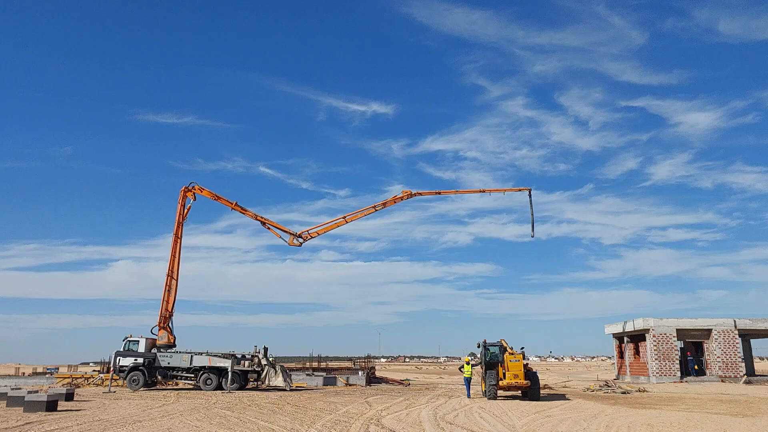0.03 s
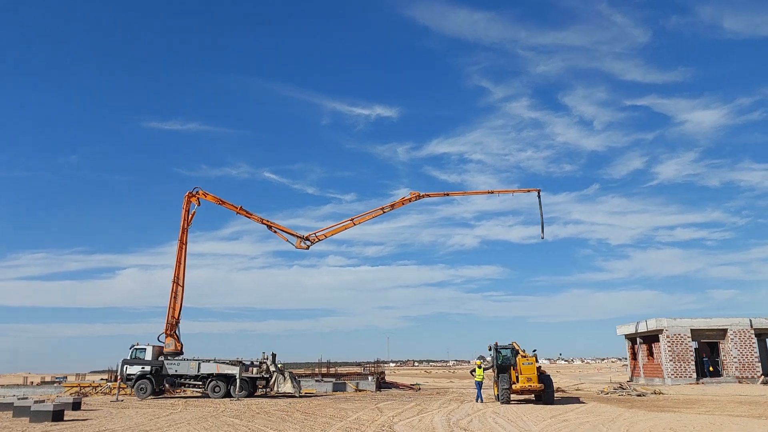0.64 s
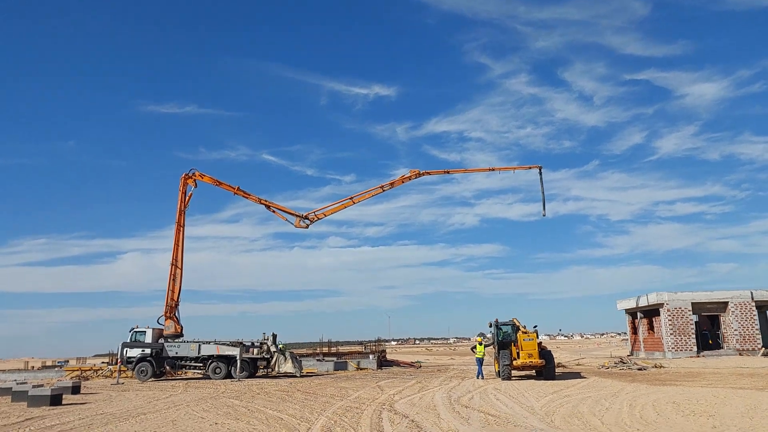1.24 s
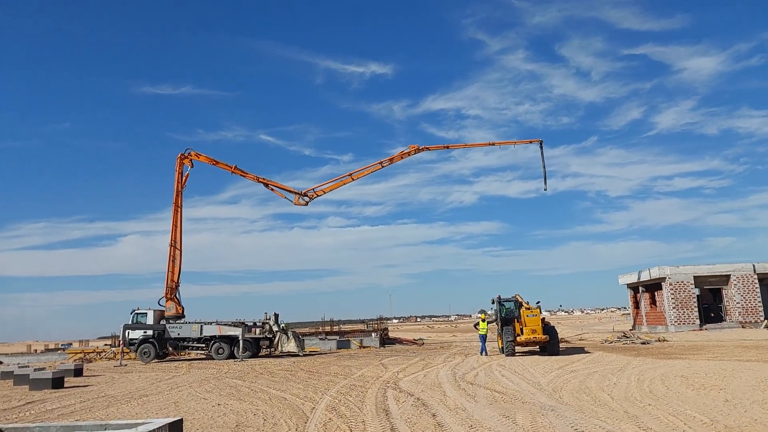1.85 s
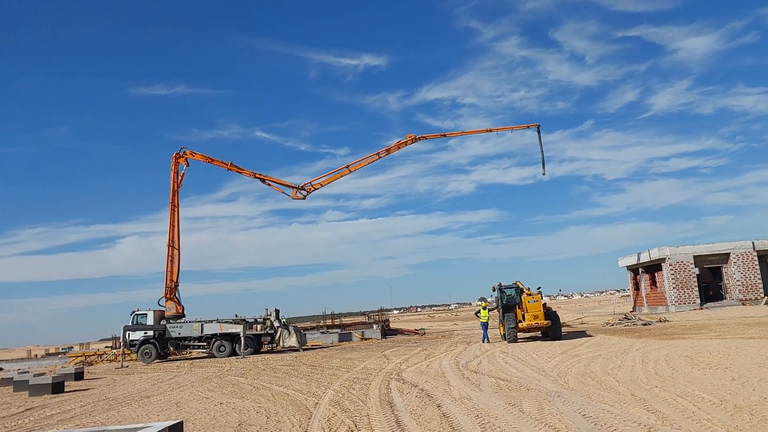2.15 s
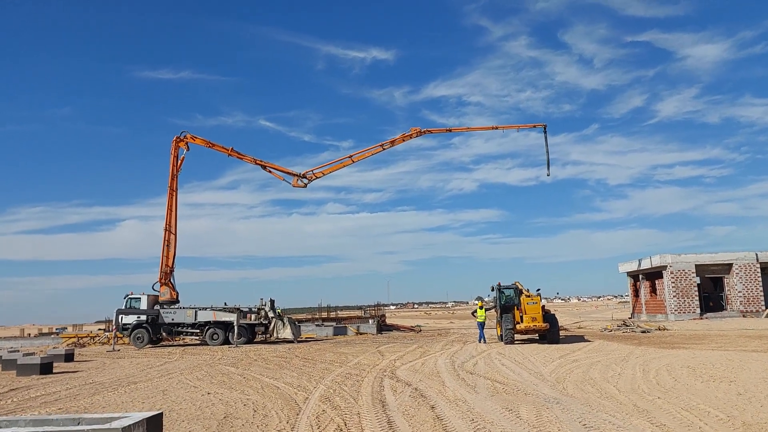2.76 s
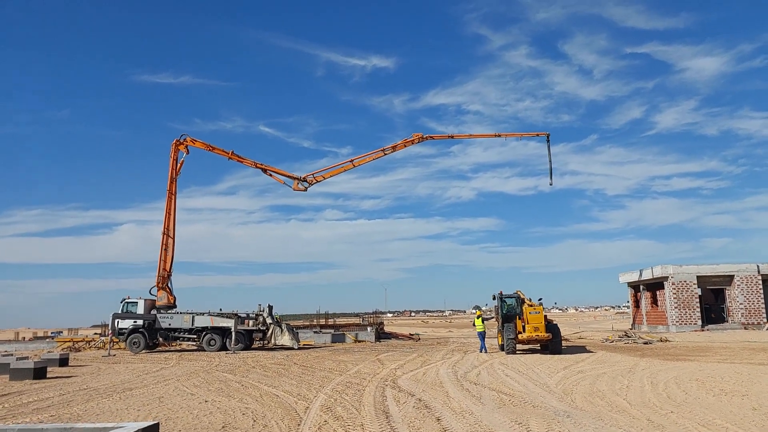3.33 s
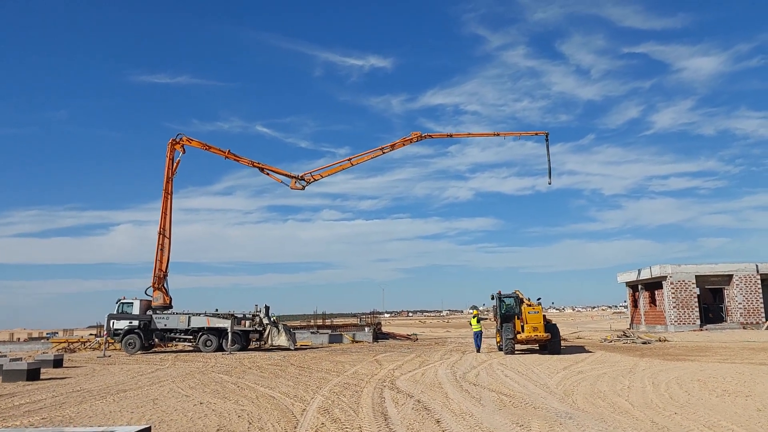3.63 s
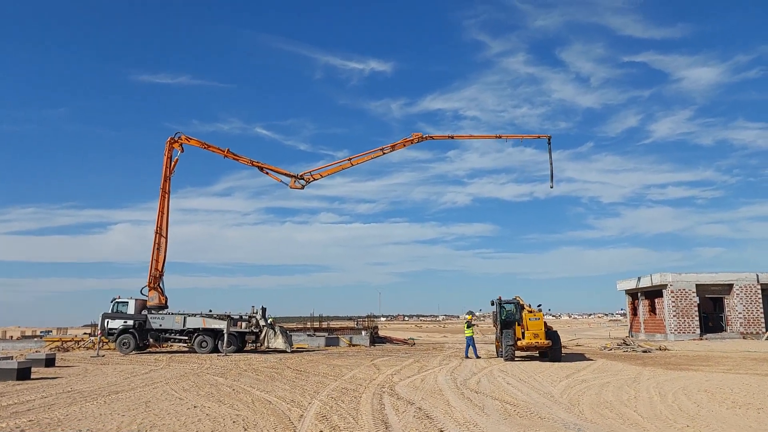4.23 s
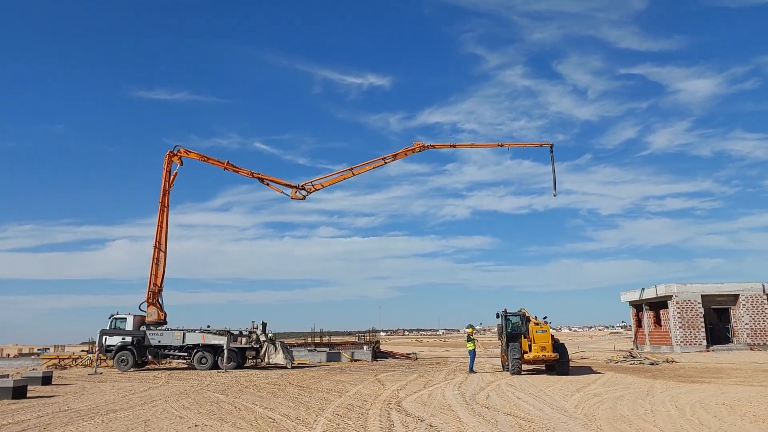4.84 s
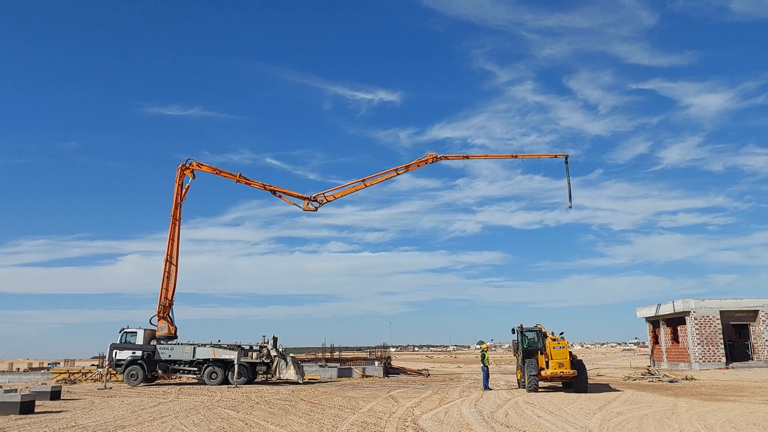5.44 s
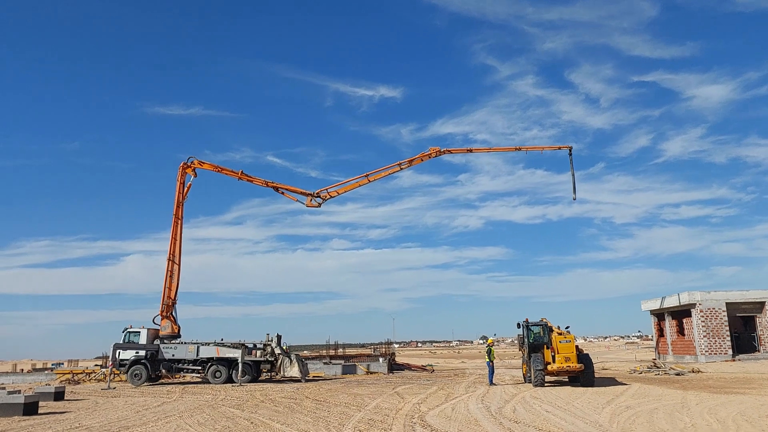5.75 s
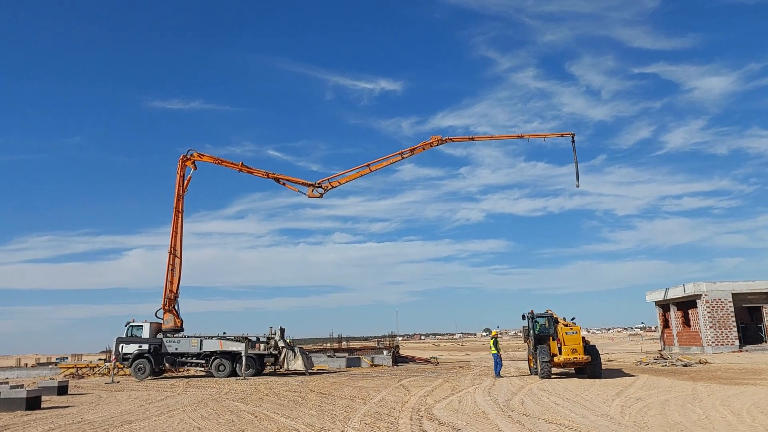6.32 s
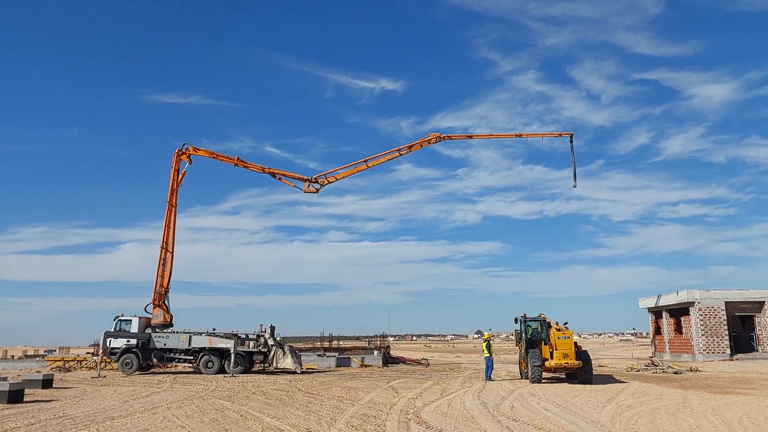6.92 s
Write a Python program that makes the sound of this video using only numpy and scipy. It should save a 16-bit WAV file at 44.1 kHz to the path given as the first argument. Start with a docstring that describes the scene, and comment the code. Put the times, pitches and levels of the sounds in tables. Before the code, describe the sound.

Wind rumbles and flutters on a hand-held microphone at an open building site, with many irregular low thumps. Farther off and quieter, a concrete pump truck's diesel runs steadily beside an idling loader, with a low drone, a wavering gear whine and faint hydraulic hiss. The machines grow a little clearer after about three seconds. Two harder gusts hit the microphone, one just past the middle and one near the end.

```python
"""Concrete pump on a windy building site

Across open ground a pump truck's diesel knocks at working speed, its gear teeth and pistons whining,
while a wheel loader idles beside it. Cooling fans rush and oil hisses through the boom's valves.
Close up, gusts and single eddies buffet the two ports of a hand-held microphone."""
import sys
import numpy as np
from scipy.fft import rfft, irfft, next_fast_len
from scipy.io import wavfile
from scipy.ndimage import uniform_filter1d, minimum_filter1d, map_coordinates

SR = 44100
rng = np.random.default_rng(int(sys.argv[2]) if len(sys.argv) > 2 else 0)


def waveform_to_disk(signal):
    """Save audio, clipped to [-1, 1], as 16-bit WAV at the path in sys.argv[1]."""
    frames = np.transpose(np.atleast_2d(signal))
    scaled = np.clip(frames, -1, 1) * 32767
    samples = np.round(scaled).astype(np.int16)
    wavfile.write(sys.argv[1], SR, samples)


N = 312228
T = np.arange(N) / SR
SIDES = np.array([[1], [-1]])  # left port, right port


def amp(db):
    """Decibels to gain."""
    return 10 ** (np.asarray(db) / 20)


def unit(x):
    """x at rms 1."""
    return x / np.sqrt(np.mean(x ** 2) + 1e-20)


def along(points, hz):
    """(Hz, value) points read on a log axis."""
    f, v = np.transpose(points)
    return np.interp(np.log(hz + 1), np.log(f + 1), v)


def curves(rows):
    """One value per sample for each column after the time."""
    s, *cols = np.transpose(rows)
    return [np.interp(T, s, c) for c in cols]


def wobble(rate):
    """A smooth random curve, rate knots a second."""
    return map_coordinates(rng.standard_normal(int(N * rate / SR) + 4), [T * rate], mode="mirror")


def filtered(x, response):
    """x times a response of frequency."""
    m = next_fast_len(N + 8192)
    return irfft(rfft(x, m) * response(np.fft.rfftfreq(m, 1 / SR)), m)[..., :N]


def coloured(x, spectrum):
    """x shaped by a spectrum, at rms 1."""
    return unit(filtered(x, lambda hz: amp(along(spectrum, hz))))


def swelled(steady_db, swells, fall=0.44):
    """A level in dB with swells (peak_s, length_s, level_db) that build slowly and stop sooner."""
    bell = lambda age, length: np.exp(-(age / length / np.where(age > 0, fall, 1 - fall)) ** 2)
    power = amp(steady_db) ** 2 + sum(amp(db) ** 2 * bell(T - s, length) for s, length, db in swells)
    return 10 * np.log10(power)


def turns(hz, drift):
    """Angle in turns at a slightly drifting speed."""
    return np.cumsum(hz * (1 + drift * wobble(3))) / SR


def tone(angle, order, fade_db=0.8):
    """A distant partial: nearly steady in phase on the straight path, wandering on two scattered ones."""
    paths = []
    for drift in [0.26 * wobble(7.3), 2.3 * wobble(4), 2.34 * wobble(4)]:
        fading = amp(fade_db * (wobble(2.98) + 0.64 * wobble(14)))
        paths.append(unit(fading * np.sin(2 * np.pi * (order * angle + rng.random()) + drift)))
    return np.array(paths)


# Low drone across the site: pitch_hz, level_db
DRONE_PARTIALS = [(106, -56), (212, -49), (317, -51), (424, -53.5)]
def drone():
    """A few low, slowly wavering partials."""
    clock = turns(1, drift=0.0029)
    return sum(amp(db) * tone(clock, order=hz, fade_db=6.0) for hz, db in DRONE_PARTIALS)


# Air resonances in the far engines: pitch_hz, width_hz, relative_db
AIR_RESONANCES = [(3270, 82, 10.5), (4310, 26, 8), (5100, 51, 7.5), (9100, 110, -5), (9380, 110, -2),
                  (10100, 200, -3)]
def whistles():
    """Air rushing through the engines whistles thinly, following the upper whine's level."""
    whine_db, = curves(UPPER_WHINE)
    level_db = -66.5 + 0.5 * (whine_db - whine_db.mean()) + wobble(4.1)
    peaks = lambda hz: sum(amp(db) / (1 + (2 * (hz - pitch) / width) ** 2)
                           for pitch, width, db in AIR_RESONANCES)
    return amp(level_db) * unit(filtered(rng.standard_normal((3, N)), peaks))


# Oil hiss from the distant boom: frequency_hz, relative_db
OIL_SPECTRUM = [(2000, -42), (3000, -8), (3400, -2), (3750, -7), (4050, -1), (4500, -14), (6000, -42)]
# Its spurts: peak_s, length_s, level_db
OIL_SPURTS = [(1.3, 0.32, -60.5), (2.55, 0.2, -68), (2.88, 0.14, -68), (3.68, 0.18, -60),
              (5.152, 0.42, -56.5)]
def valves(seep_db=-16, sputter_db=2.2):
    """Oil seeps and spurts through the boom's valves with an uneven hiss."""
    clatter_db, _ = curves(SITE_CARRY)
    level_db = swelled(clatter_db + seep_db, OIL_SPURTS) + sputter_db * wobble(16)
    return amp(level_db) * coloured(rng.standard_normal((3, N)), OIL_SPECTRUM)


# The far fans' rush and highest hiss: frequency_hz, relative_db
RUSH_SPECTRUM = [(150, -23), (350, 15.5), (700, 17), (1200, 14.5), (1800, 14.5), (3500, 4), (4200, 3.5),
                 (4800, 0), (5600, 1), (6500, -0.5), (7900, -8), (9800, -5.5), (11400, -13.5), (15800, -23)]
FIZZ_SPECTRUM = [(5000, -40), (8000, -9), (9600, -1.5), (11400, 1), (13000, 3), (14200, -4), (15800, -9.5)]
def fans():
    """Cooling fans push air; their highest hiss swings wider in level than their rush."""
    _, fan_db = curves(SITE_CARRY)
    shimmer_db = 0.55 * wobble(9)
    fizz_db = -68.5 + 1.2 * (fan_db - fan_db.mean())
    rush = amp(fan_db + 14) * coloured(rng.standard_normal((3, N)), RUSH_SPECTRUM)
    fizz = amp(fizz_db) * coloured(rng.standard_normal((3, N)), FIZZ_SPECTRUM)
    return amp(shimmer_db) * (rush + fizz)


def diesel(angle, spectrum, repeat, decay, uneven_db, cylinders=6):
    """Knocks of a four-stroke engine along three paths: straight, and scattered to each port."""
    cycle = angle / 2 % 1
    cycle_samples = int(2 * N / angle[-1])
    # part of the block's rattle repeats every working cycle
    pattern = rng.standard_normal((3, cycle_samples))[:, (cycle * cycle_samples).astype(int)]
    rattle = np.sqrt(repeat) * pattern + np.sqrt(1 - repeat) * rng.standard_normal((3, N))
    # each cylinder fires with its own strength, and its knock fades until the next
    firing = cycle * cylinders
    strength = amp(uneven_db * unit(rng.standard_normal(cylinders)))[firing.astype(int)]
    return coloured(rattle * strength * np.exp(-decay * (firing % 1)), spectrum)


# A steel panel's ring across the site: frequency_hz, relative_db
PANEL_SPECTRUM = [(1500, -60), (2040, -22), (2115, 5), (2180, 1), (2255, -5), (2330, -17), (3200, -58)]
def panel(idle):
    """A steel panel rings near the gear octave, in throbs at the idling engine's firing rate."""
    _, octave_db = curves(GEAR_WHINE)
    return amp(octave_db - 2) * diesel(idle, PANEL_SPECTRUM, repeat=0.26, decay=1.7, uneven_db=2.5)


# The truck's gear whine from a distance: time_s, mesh_db, octave_db
GEAR_WHINE = [(0.1, -68, -66), (0.95, -70, -72), (1.15, -67, -65), (1.55, -74, -58), (2.25, -68, -57),
              (2.5, -64, -53.5), (2.98, -72, -60), (3.12, -62, -47.5), (3.5, -48, -52.5),
              (4.05, -51.5, -55), (4.2, -53.5, -50), (4.6, -53, -56.5), (5.1, -53.5, -53),
              (5.45, -62, -58.5), (6.2, -55, -56), (6.45, -54.5, -44.5), (6.8, -58, -49.5),
              (7.05, -57, -48.5)]
# Upper whine of gears and pump, near 3.3 kHz: time_s, relative_db
UPPER_WHINE = [(0.1, -70), (0.9, -83), (1.6, -65.5), (1.95, -75), (2.6, -64), (2.88, -63), (3.02, -66),
               (3.3, -63), (3.55, -66), (3.88, -54), (4.08, -63), (4.47, -71), (5.0, -60.5), (5.92, -69),
               (6.25, -64), (7.05, -66)]
def gears(crank, teeth=35):
    """The pump drive's teeth bear unevenly; a load swinging twice a turn gives the octave side tones."""
    mesh_db, octave_db = curves(GEAR_WHINE)
    mesh = amp(mesh_db) * tone(crank, teeth) * unit(1 + 0.75 * wobble(70))
    octave = amp(octave_db) * tone(crank, 2 * teeth)
    lower = amp(octave_db - 5) * tone(crank, 2 * teeth - 2)
    upper = amp(octave_db - 8) * tone(crank, 2 * teeth + 2)
    third = amp(curves(UPPER_WHINE)[0] - 2.5) * tone(crank, 3 * teeth, fade_db=3.0)
    fourth = amp(curves(SITE_CARRY)[0] - 20) * tone(crank, 4 * teeth, fade_db=9.0)
    roughness = unit(1 + 0.42 * wobble(45))
    return mesh + roughness * (octave + lower + upper) + third + fourth


# The hydraulic pump's harmonics, 1-10 and 11-13: relative_db
PUMP_LOW = [-9, -8, -21, -21, -7.5, -25, -2, -15, -22, -32]
PUMP_HIGH = [-7, -1.5, -5.5]
# How well the lower ten carry to the microphone: time_s, gain_db
PUMP_REACH = [(0.1, 0), (1.3, -4), (3.0, -1), (4.2, 1), (4.6, 0.5), (5.5, 2), (6.2, -6), (7.0, -8)]
def pump(crank, levels_db, reach, first, pistons=9):
    """Piston strokes make a row of harmonics, here from number `first` up."""
    harmonics = sum(amp(db) * tone(crank, pistons * k) for k, db in enumerate(levels_db, first))
    return amp(curves(reach)[0]) * harmonics


# The two engines from across the site: frequency_hz, relative_db
TRUCK_SPECTRUM = [(90, -31), (220, 11), (420, 10.5), (800, -14), (1100, 0.5), (1500, 1.5), (2020, 1),
                  (2170, 2), (2420, 3.5), (2750, -2), (2950, -10), (3400, -9.5), (4500, -19), (7000, -36),
                  (15000, -56)]
LOADER_SPECTRUM = [(120, -27), (300, 6), (600, -0.5), (1000, 1.5), (1800, -9), (2020, 5), (2180, 1.5),
                   (2600, -11), (3500, -11.5), (4600, -18), (6000, -21.5), (9000, -40), (15000, -54)]
def engines(crank, idle):
    """The truck's diesel clatters at working speed; the loader's knocks at idle."""
    truck = amp(6.5) * diesel(crank, TRUCK_SPECTRUM, repeat=0.81, decay=0.48, uneven_db=4.5)
    loader = amp(4.5) * diesel(idle, LOADER_SPECTRUM, repeat=0.52, decay=0.93, uneven_db=5.5)
    return truck + loader


# Sound that reaches the microphone straight: frequency_hz, power_share
DIRECT_SHARE = [(100, 0.84), (700, 0.97), (1100, 0.77), (1900, 0.53), (2110, 0.82), (2200, 0.9),
                (2320, 0.5), (3400, 0.56), (5200, 0.34), (7500, 0), (13000, 0.1)]
# The left port's lead as sound bends round the housing: frequency_hz, phase_rad
LEFT_LEAD = [(200, .2), (1100, .9), (1400, 1.6), (1650, 2.8), (1900, 2.5), (2170, 4.4), (2400, 3.7),
             (2950, 4.8), (3270, 6), (4650, 9.2), (6120, 12.5), (10900, 20.7), (15400, 29)]
def at_ports(paths):
    """The straight path reaches the right port late; the scattered paths are unrelated."""
    direct = lambda hz: along(DIRECT_SHARE, hz)
    lead = lambda hz: np.exp(1j * SIDES * along(LEFT_LEAD, hz) / 2)
    straight = filtered(paths[0], lambda hz: np.sqrt(direct(hz)) * lead(hz))
    return straight + filtered(paths[1:], lambda hz: np.sqrt(1 - direct(hz)))


# How strongly the machines carry over the site, in relative levels: time_s, clatter_db, fan_db
SITE_CARRY = [(0.3, -67.5, -70), (0.85, -59, -71), (1.55, -60, -65), (2.1, -59.5, -65.5),
              (2.45, -53, -65.5), (3.0, -56, -63), (3.25, -51, -60.5), (3.85, -49.5, -57),
              (4.45, -57.5, -61), (5.05, -53, -61), (5.6, -53.5, -59), (6.2, -52, -60), (7.0, -49.5, -61.5)]
def machines(truck_hz=31.25, loader_hz=12.27):
    """The far machines swell and sink as the wind carries them."""
    # the governors let both crankshafts drift a little
    crank, idle = turns(truck_hz, drift=0.000505), turns(loader_hz, drift=0.00099)
    clatter = engines(crank, idle)
    carry = amp(curves(SITE_CARRY)[0] + 1.5 + 1.4 * wobble(6.8))
    running = carry * (clatter + pump(crank, PUMP_LOW, PUMP_REACH, first=1))
    pump_top = pump(crank, PUMP_HIGH, UPPER_WHINE, first=11)
    paths = running + pump_top + panel(idle) + fans() + valves() + whistles() + gears(crank) + drone()
    return at_ports(paths)


# Faint ticks close to the microphone: start_s, relative_db
NEAR_TICKS = [(0.874, -58), (1.0157, -58.5), (1.124, -56), (1.2027, -55), (1.252, -55), (1.301, -54),
              (1.664, -57), (1.7774, -51), (1.8044, -52), (1.947, -54), (2.049, -54), (2.1012, -59),
              (2.2668, -49), (4.484, -52)]
def ticks(samples=400, decay_s=0.0089):
    """Tiny dry ticks, a few milliseconds each, louder on the right."""
    out = np.zeros((2, N))
    for s, db in NEAR_TICKS:
        start = round(s * SR)
        envelope = amp(db - 60 * T[:samples] / decay_s)
        out[:, start:start + samples] += envelope * rng.standard_normal((2, samples))
    return out * amp([[-1], [5]])


# Lulls in the rumble at one port: start_s, end_s, port (0 left, 1 right)
PORT_LULLS = [(0.186, 0.417, 1), (0.795, 0.915, 1), (0.968, 1.144, 1), (1.204, 1.48, 1), (1.718, 1.865, 1),
              (2.046, 2.2, 1), (2.872, 3.023, 1), (3.933, 4.256, 1), (4.43, 4.555, 0), (5.282, 5.406, 1),
              (5.498, 5.612, 1), (5.71, 5.815, 1), (6.028, 6.167, 1), (6.665, 7.1, 1)]
def lulls(depth_db=19, fade_s=0.02):
    """How far the rumble has sunk at each port, in dB."""
    sunk = np.zeros((2, N))
    for start, end, port in PORT_LULLS:
        sunk[round(port)] += np.clip(np.minimum(T - start, end - T) / fade_s, 0, 1)
    return depth_db * sunk


# Brief calms at both ports: centre_s, length_s, depth_db
WIND_CALMS = [(0.335, 0.025, 6.5), (0.974, 0.018, 3), (1.793, 0.014, 6), (2.187, .025, 10),
              (2.966, 0.074, 3), (3.525, 0.021, 11), (4.67, .025, 9), (5.75, 0.019, 9), (6.795, 0.016, 7)]
def calms():
    """How far the flutter sinks as the wind drops, in dB."""
    return sum(db * np.exp(-((T - s) / length) ** 2) for s, length, db in WIND_CALMS)


def turbulence(spectrum, lumpy_db, lump_rate, window=3500):
    """Lumpy pressure noise, unrelated at the two ports, of even strength over longer stretches."""
    lumps = amp(lumpy_db * np.array([wobble(lump_rate), wobble(lump_rate)]))
    x = coloured(lumps * rng.standard_normal((2, N)), spectrum)
    return x / np.sqrt(np.abs(uniform_filter1d(x ** 2, window, axis=1)) + 1e-6)


# Wind right on the microphone: frequency_hz, relative_db
RUMBLE_SPECTRUM = [(10, -37), (25, -9), (42, -4.5), (58, 2), (100, -4), (150, -3), (220, -10.5),
                   (300, -13.5), (600, -61), (1500, -90)]
FLUTTER_SPECTRUM = [(30, -33), (140, -23), (220, -5), (310, 2), (430, -2.5), (620, -8), (790, -16),
                    (1200, -23), (1800, -30), (4000, -46.5), (12000, -65.5)]
RASP_SPECTRUM = [(200, -42), (450, 3), (700, 4.5), (1100, -6), (1700, -39), (2200, -28), (2700, -55),
                 (5000, -60), (12000, -88)]
# The breeze, in relative levels: time_s, flutter_db, rumble_db
PORT_BREEZE = [(0.1, -37.5, -25), (0.35, -39, -30.5), (0.6, -35.5, -29), (1.0, -31, -23.5),
               (1.3, -35.5, -29), (2.1, -31.5, -25), (2.45, -35.5, -33.5), (2.95, -42, -33.5),
               (3.3, -42, -32), (3.8, -38.5, -30), (4.15, -29.5, -25.5), (4.6, -35, -29),
               (4.95, -29.5, -27.5), (5.35, -37.5, -35.5), (5.85, -34, -31), (6.35, -31.5, -33),
               (7.05, -33, -31.5)]
# Gusts over it, on the same scale: peak_s, length_s, flutter_db, rumble_db
PORT_GUSTS = [(0.087, 0.045, -29.5, -27), (0.294, 0.03, -32.5, -27), (0.492, 0.074, -33, -21),
              (0.714, 0.031, -33.5, -22), (1.152, 0.015, -35, -27), (1.488, 0.024, -30.5, -22.5),
              (1.672, 0.053, -30, -23), (2.011, 0.15, -27.5, -38), (2.277, 0.037, -27, -33),
              (2.36, 0.049, -48, -30.5), (2.56, 0.041, -48, -29.5), (4.3, .1, -23.5, -26),
              (4.351, 0.019, -19, -29), (4.409, 0.05, -26, -28), (4.79, 0.14, -29.5, -40),
              (5.133, 0.042, -30, -25), (5.447, 0.054, -51, -27.5), (5.65, 0.076, -35.5, -34.5),
              (5.97, 0.047, -34, -28.5), (6.25, 0.18, -35, -25.5), (6.561, 0.12, -21.5, -21),
              (6.63, 0.044, -20, -28), (6.856, 0.056, -26, -39)]
def wind(windward_db=3):
    """Gusts ride on a breeze and rumble and flutter at the ports; the hardest break into a rasp."""
    breeze_flutter_db, breeze_rumble_db = curves(PORT_BREEZE)
    s, length, gust_flutter_db, gust_rumble_db = np.transpose(PORT_GUSTS)
    flurry_db = 1.17 * wobble(22)  # quick chance swings of the wind's strength
    flutter_db = swelled(breeze_flutter_db + flurry_db, zip(s, length, gust_flutter_db)) - calms()
    rumble_db = swelled(breeze_rumble_db + flurry_db, zip(s, length, gust_rumble_db)) - 0.5 * calms()
    rumble_db = rumble_db + SIDES * windward_db / 2 - lulls()  # the left port faces the wind
    rasp_db = -34 + 1.51 * (flutter_db - flurry_db + 22)
    rumble = amp(rumble_db - 1.04) * turbulence(RUMBLE_SPECTRUM, lumpy_db=4.5, lump_rate=50, window=4400)
    flutter = amp(flutter_db - 1.13) * turbulence(FLUTTER_SPECTRUM, lumpy_db=4, lump_rate=80, window=2800)
    rasp = amp(rasp_db) * turbulence(RASP_SPECTRUM, lumpy_db=5.5, lump_rate=160)
    return rumble + flutter + rasp


# Single eddies striking the microphone: centre_s, peak_db, pitch_hz, left_minus_right_db
PORT_EDDIES = [(0.078, -27.5, 520, 2), (0.097, -20, 151, -9), (0.155, -22.5, 96, 0),
               (0.469, -11.5, 147, -2), (0.523, -19, 260, 1), (0.715, -15, 213, -1), (0.935, -26, 134, 4),
               (1.173, -19.5, 97, 2), (1.270, -24, 168, 6), (1.344, -26.5, 240, 10), (1.379, -23.5, 380, 2),
               (1.401, -20.5, 199, 1), (1.477, -26, 183, 0), (1.561, -19.5, 127, -4),
               (1.611, -17.5, 334, 4), (1.685, -7.5, 82, 4.5), (1.835, -20.5, 435, 0), (1.892, -18, 276, 5),
               (1.977, -17, 226, 6), (2.003, -20.5, 80, 2), (2.271, -13.5, 450, 3), (2.383, -18, 48.4, 1),
               (2.484, -29, 330, -3), (2.538, -26, 148, 2), (2.619, -22, 222, 1), (2.784, -25.5, 302, 4),
               (3.093, -25.5, 100, 1), (3.201, -21.5, 171, -1), (3.345, -24.5, 180, -5),
               (3.407, -21.5, 205, 1), (3.485, -22, 228, -1), (3.663, -22, 111, 1), (3.745, -26.5, 216, -5),
               (3.881, -19, 292, 0), (3.942, -21.5, 278, -3), (4.014, -24, 184, 9), (4.194, -28, 308, 8),
               (4.238, -11, 366, 4.5), (4.281, -12.5, 440, 12), (4.302, -11, 216, -3), (4.335, -3, 537, 3),
               (4.357, -10, 224, -12.5), (4.634, -20.5, 320, -3), (4.824, -16.5, 198, 2),
               (4.856, -16, 146, 9), (4.879, -16, 404, -2), (4.94, -19, 330, 5), (4.989, -20.5, 198, 2),
               (5.043, -13, 464, 5), (5.198, -13, 261, 7.5), (5.427, -23, 146, -2), (5.656, -22.5, 253, 6),
               (5.698, -19, 300, 4), (5.811, -19, 340, 5), (5.851, -27, 220, 0), (5.875, -16, 70, 5),
               (5.979, -21, 286, 9), (6.035, -23.5, 305, 11), (6.179, -20.5, 310, 2),
               (6.203, -14.5, 162, -3), (6.255, -21, 99, -3), (6.295, -21, 158, 5), (6.478, -12, 432, -2),
               (6.503, -20, 173, 0), (6.546, -15, 290, 1), (6.565, -12, 543, 5), (6.582, -4.5, 500, 7),
               (6.613, -9, 170, 3), (6.635, -14, 500, -3), (6.654, -15.5, 81, -2), (6.744, -18.5, 232, 8),
               (6.842, -14.5, 300, 1)]
def eddies(wake_db=-11.5, wake_s=0.046):
    """An eddy is a short swing of pressure, a thump if weak, a crack if strong, with a puff behind it."""
    blows, wake = np.zeros((2, N)), np.zeros(N)
    phases = rng.standard_normal((len(PORT_EDDIES), 2, 1))
    for (s, db, hz, pan_db), phase in zip(PORT_EDDIES, phases):
        near = np.abs(T - s) < 0.06
        age = T[near] - s
        swings = 0.27 - 0.07 * db  # weaker eddies swing more times
        pulse = np.sin(2 * np.pi * hz * age + phase) / np.cosh(np.pi * hz * age / swings)
        blows[:, near] += amp(db + SIDES * pan_db / 2) * pulse / np.abs(pulse).max(axis=1, keepdims=True)
        wake[near] += amp(db + wake_db - 60 * np.abs(age) / wake_s) * (age > 0)
    puffs = uniform_filter1d(wake, size=130) * turbulence(FLUTTER_SPECTRUM, lumpy_db=-2.5, lump_rate=240)
    return blows + puffs


def scene():
    """Machines across the site, wind on the microphone."""
    return machines() + wind() + eddies() + ticks()


def limiter(x, ceiling=0.68, hold_s=0.03):
    """The recorder turns down at once for a blow that would overload it, and recovers just after."""
    hold = int(hold_s * SR)
    needed = ceiling / np.maximum(np.abs(x).max(axis=0), ceiling)
    held = minimum_filter1d(needed, size=hold, origin=hold // 2 - 64)
    return x * uniform_filter1d(held, size=128)


OPEN_S, FADE_IN_S, TOP_HZ = 0.068, 0.002, 15780
# The microphone's two ports differ in colour: frequency_hz, left_minus_right_db
PORT_BALANCE = [(120, 0.5), (250, -0.5), (550, -4), (1200, -3.5), (2400, -2), (4400, -1.5), (8500, 3),
                (13000, -2)]
def record(dry):
    """The hand-held microphone opens a moment late, colours each port, limits blows and cuts the top."""
    opened = dry * np.clip((T - OPEN_S) / FADE_IN_S, 0, 1)
    ports = filtered(opened, lambda hz: amp(SIDES * along(PORT_BALANCE, hz) / 2))
    return filtered(limiter(ports), lambda hz: hz < TOP_HZ)


dry = scene()
out = record(dry)
waveform_to_disk(out)
```